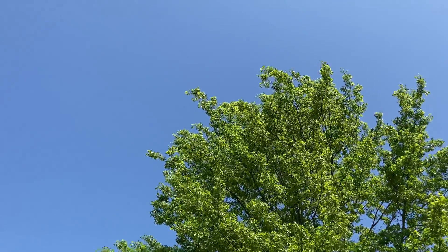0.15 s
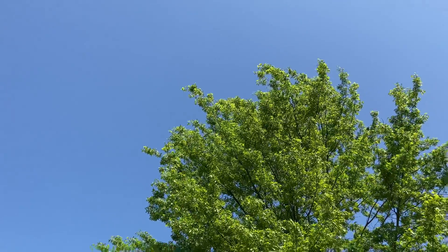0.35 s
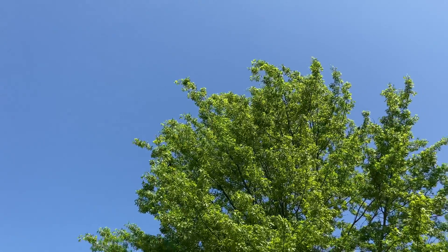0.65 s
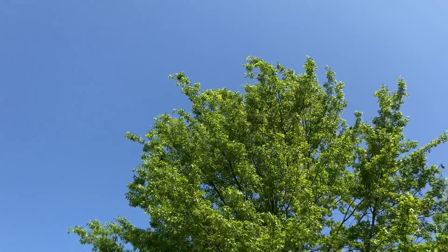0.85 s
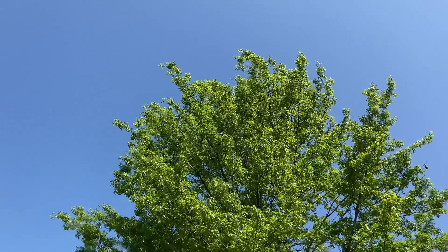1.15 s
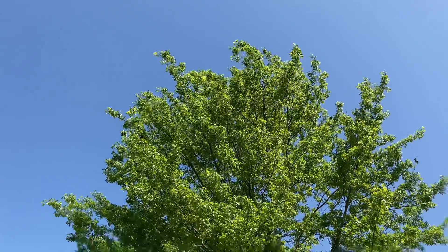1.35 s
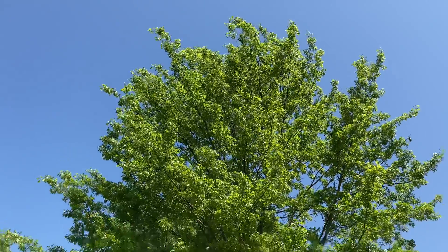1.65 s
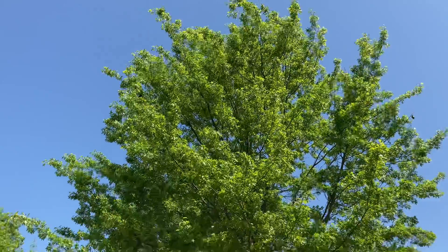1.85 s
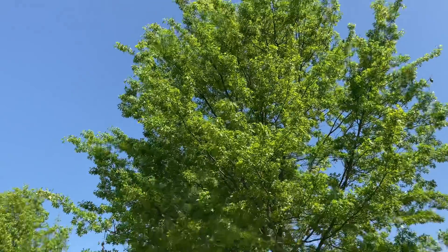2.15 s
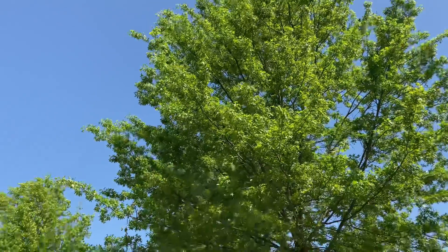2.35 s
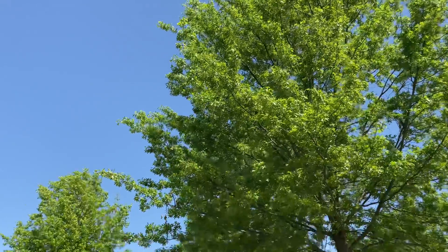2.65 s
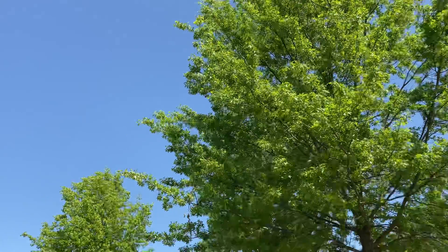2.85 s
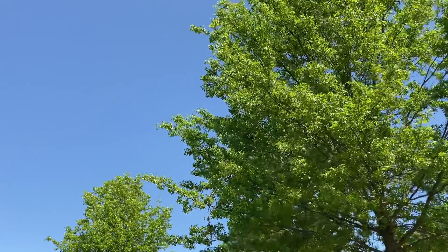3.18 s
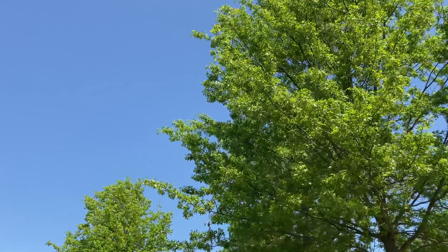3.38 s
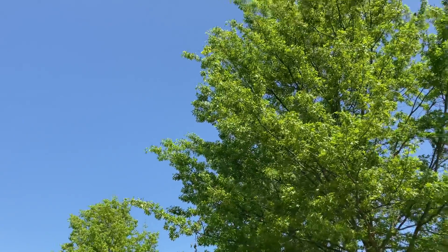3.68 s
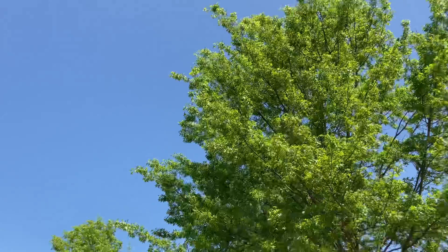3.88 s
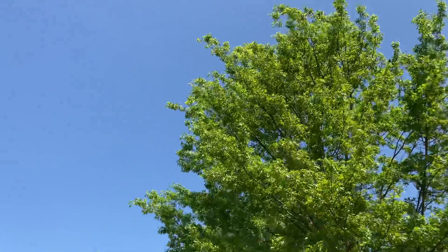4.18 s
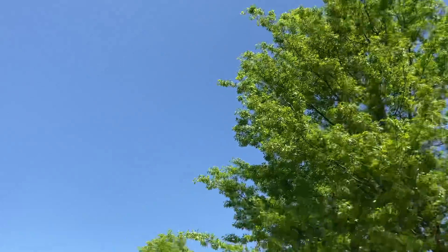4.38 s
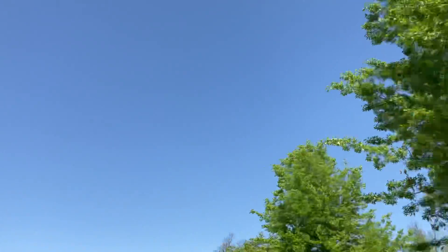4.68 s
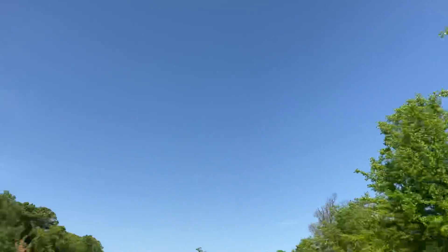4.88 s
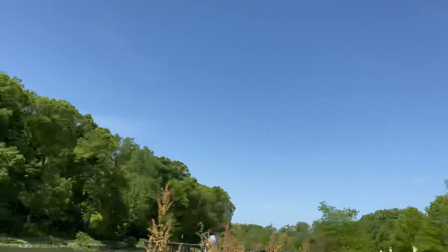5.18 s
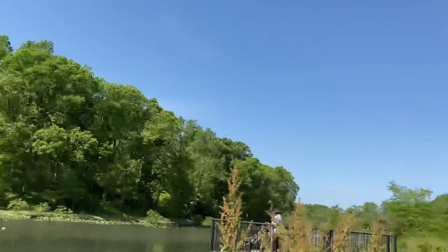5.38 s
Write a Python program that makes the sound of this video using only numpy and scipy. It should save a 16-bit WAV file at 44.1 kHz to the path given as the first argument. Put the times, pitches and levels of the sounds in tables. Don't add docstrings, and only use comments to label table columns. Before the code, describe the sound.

In an open park, faint songbirds chirp and slur over a soft low traffic rumble. Harsh, short chucks come singly, then a clear falling alarm whistle sounds near two seconds. A wind gust thumps the phone microphone around three and a half seconds. A second whistle follows near five, then a loud chuck and another low wind bump. Leaves and ground return soft echoes in wide stereo.

```python
import sys
import numpy as np
from scipy import signal
from scipy.fft import rfft, irfft, next_fast_len
from scipy.io import wavfile
from scipy.ndimage import uniform_filter1d

SR = 44100
rng = np.random.default_rng(int(sys.argv[2]) if len(sys.argv) > 2 else 0)


def log_audio(samples):
    frames = np.atleast_2d(samples).T
    limited = np.clip(frames, -1, 1)
    pcm = np.round(limited * 32767).astype(np.int16)
    wavfile.write(sys.argv[1], SR, pcm)


def field_ratio(decibels):
    return 10 ** (np.asarray(decibels, dtype=float) / 20)


N = 243873
OPPOSITE = np.array([[1], [-1]])


def level(x, db):
    return x * field_ratio(db) / np.sqrt(np.mean(x ** 2))


def walk(rate, size=N):
    hold = max(int(SR / rate), 1)
    steps = np.repeat(rng.standard_normal(size // hold + 1), hold)
    return 1.3 * uniform_filter1d(uniform_filter1d(steps, hold), hold)[:size]


def glide(t, at, span):
    return .5 - .5 * np.tanh((t - at) / span / 2)


def breeze(points, swell_db, flicker_db):
    size = next_fast_len(N, True)
    octave = np.log2(np.fft.rfftfreq(size, 1 / SR) + 1)
    hz, db = np.transpose(points)
    colour = field_ratio(np.interp(octave, np.log2(hz), db, -200, -200))
    spectrum = rfft(rng.standard_normal(size)) * colour
    total = 0
    for band in np.arange(np.floor(np.log2(hz[0])), np.log2(hz[-1]) + 1):
        part = irfft(spectrum * np.clip(1 - abs(octave - band), 0, 1), size)[:N]
        total = total + part * field_ratio(swell_db * walk(2.4) + flicker_db * walk(14))
    return level(total, 0)


def add(out, s, x, pan_db, rad, lead_ms):
    size = next_fast_len(len(x) + 128, True)
    hz = np.fft.rfftfreq(size, 1 / SR)
    turn = rad + 2 * np.pi * (hz - 4000) * lead_ms / 1000
    spectrum = rfft(np.pad(x, 64), size)
    at = int(s * SR)
    for port, sign in enumerate((.5, -.5)):
        y = irfft(spectrum * np.exp(1j * sign * turn), size)[64:] * field_ratio(sign * pan_db)
        out[port, at:at + len(y)] += y[:N - at]


def open_air():
    # f/Hz, level/dB per Hz
    common = [(160, -37.5), (280, -4.5), (694, -7.5), (1120, -7), (2100, -17.5), (3990, -23.5),
              (5600, -38.5), (8060, -53)]
    # f/Hz, level/dB per Hz
    opposed = [(160, -39), (280, -6), (800, -1.5), (2010, -9.5), (2850, -19), (3790, -17), (6200, -32.5),
               (8060, -54.5)]
    return field_ratio(-59) * breeze(common, 0.19, 1.0) + field_ratio(-59) * breeze(opposed, 0.72, 0.91) * OPPOSITE


def hiss():
    # f/Hz, level/dB per Hz
    noise_points = [(5500, -28.5), (6300, -25), (7500, 1), (9000, 3), (11000, 1), (13000, -3.5),
                    (16000, -17.5)]
    return field_ratio(-87.5) * breeze(noise_points, 1, 1.5)


def wind():
    # t/s, spread/s, level over calm/dB
    gusts = [(0.0, .06, 4.5), (.72, 0.071, 4.5), (1.38, 0.029, 5.5), (2.3, 0.25, 2.5), (2.74, 0.16, 3),
             (3.299, 0.19, 5), (3.511, 0.095, 14), (3.629, 0.032, 21), (3.78, 0.015, 6.5),
             (3.95, 0.057, 1.5), (4.22, 0.065, 5), (4.48, 0.15, 3.5), (4.75, 0.088, 8.5), (4.98, 0.089, 7),
             (5.33, .045, 16), (5.53, 0.062, 3.5)]
    # t/s, peak level/dB, f/Hz
    thumps = [
        (3.489, -27, 70),
        (3.553, -29, 90),
        (3.622, -19.5, 135),
        (4.809, -30, 119),
        (4.965, -33, 120),
        (5.289, -31, 110),
        (5.33, -25, 85),
        (5.349, -27, 210),
        (5.353, -29, 110),
    ]
    # f/Hz, level/dB per Hz
    rumble = [(13, -41.5), (22, -31), (35, -17), (54, 2), (91, -2.5), (119, -3), (170, -20.5), (240, -52)]
    flutter = [(120, -5.5), (150, 3.0), (220, -4.0), (330, -11), (400, -18.0)]  # f/Hz, level/dB per Hz
    t = np.arange(N) / SR
    gust_db = np.max([db * np.exp(-.5 * ((t - s) / spread) ** 2) for s, spread, db in gusts], axis=0)

    def buffeting(extra_db):
        slow = breeze(rumble, 0.28, 1.0) * field_ratio(-47 + gust_db)
        quick = breeze(flutter, 0.39, 2.6) * field_ratio(-57.5 + 0.66 * gust_db + extra_db)
        return slow + quick

    mid, side = buffeting(0), buffeting(2.5)
    for at, db, hz in thumps:
        pulse = np.exp(-.5 * ((t - at) * hz / 0.8) ** 2)
        mid = mid + field_ratio(db) * pulse * np.sin(2 * np.pi * hz * (t - at))
    return mid + field_ratio(-10.5) * side * OPPOSITE


def far_birds():
    # t/s, length/s, start f/Hz, end f/Hz, level/dB
    chatter = [(0.079, .055, 3900, 5870, -70), (.12, 0.044, 4710, 3870, -64.5),
               (0.161, 0.078, 3700, 2980, -56), (.578, 0.027, 2710, 2690, -53),
               (0.826, .045, 5780, 4200, -65), (0.865, 0.11, 4000, 2900, -60.5),
               (0.804, 0.029, 5500, 5660, -70.5), (1.256, 0.055, 4600, 3600, -65.5),
               (1.746, 0.033, 4600, 4730, -63), (1.792, .048, 4000, 3110, -66),
               (3.231, 0.075, 3800, 5280, -64.5), (3.296, 0.049, 4400, 3670, -59),
               (3.429, 0.034, 3550, 3480, -63), (3.86, 0.046, 3900, 4080, -58.5),
               (3.93, 0.04, 4030, 4370, -62), (4.363, 0.052, 3700, 3854, -63),
               (5.051, 0.12, 1500, 1614, -59.5)]
    # t/s, length/s, start f/Hz, end f/Hz, level/dB
    pipes = [(.135, 0.046, 4210, 4200, -64), (.505, .051, 3550, 3430, -56.5), (.58, .026, 3500, 3400, -76),
             (1.79, .035, 3700, 3880, -63.5), (1.97, .05, 2750, 2830, -66), (2.33, .057, 2800, 2830, -68.5),
             (2.65, .13, 3580, 3470, -59.5), (2.725, 0.046, 4560, 4450, -59.5),
             (2.83, 0.096, 3600, 3520, -63), (3.41, 0.11, 2150, 1730, -62), (3.44, 0.06, 2250, 2100, -77),
             (3.437, 0.15, 3430, 3476, -69.5), (3.585, 0.058, 5750, 5540, -72),
             (4.79, 0.066, 3400, 2345, -64.5), (5.44, 0.15, 3750, 3310, -62), (5.44, 0.1, 4400, 4000, -64)]
    # t/s, start f/Hz, end f/Hz, level/dB
    strokes = [(0, 3120, 3590, -61.5), (1.015, 4600, 5880, -72), (1.125, 6100, 6850, -78),
               (1.356, 3960, 4700, -80), (1.43, 6270, 6470, -76), (4.125, 2770, 3270, -73.5),
               (4.143, 3320, 4000, -70), (4.294, 4800, 5730, -80), (4.36, 2560, 3360, -72),
               (4.4, 3660, 2820, -64.5), (4.445, 4400, 5860, -73), (4.45, 3730, 3890, -67),
               (4.469, 3830, 4520, -58.5), (4.515, 4400, 3580, -75), (4.538, 3600, 4370, -60.5),
               (4.555, 2960, 3650, -62), (4.65, 4270, 4630, -72), (4.741, 2980, 3400, -66),
               (5.514, 1750, 1710, -55)]
    # t/s, length/s, f/Hz, level/dB
    buzzes = [
        (0.125, 0.23, 5730, -77.5),
        (0.226, .32, 6540, -82),
        (0.572, .14, 6500, -83.5),
        (1.479, 0.087, 5470, -66.5),
        (1.581, 0.045, 5980, -73),
        (1.877, 0.094, 5480, -74.5),
        (3.687, .25, 5280, -69.5),
        (4.507, .055, 4960, -79),
    ]
    # t/s, low part level/dB, high part level/dB
    slurs = [(.085, -59, -66), (2.02, -71.5, -72), (2.21, -65.5, -72), (2.405, -65, -70), (2.6, -66, -60),
             (2.79, -58, -59.5), (2.975, -58, -60), (3.175, -61, -62), (3.365, -62.5, -61.5),
             (3.58, -73.5, -71), (3.95, -69, -82)]
    low_hz, mid_hz, top_hz = 1950, 2520, 3450
    rise_s, climb_s, slur_echo_s = .04, .065, .024
    chorus_low_hz, chorus_high_hz, chorus_sweep_hz = 2330, 6470, 504

    # t/s, length/s, start f/Hz, end f/Hz, warble/Hz, level/dB
    notes = [(*row[:4], 330, row[4]) for row in chatter]
    notes += [(*row[:4], 40, row[4]) for row in pipes]
    notes += [(s, .022, hz0, hz1, 80, db) for s, hz0, hz1, db in strokes]
    notes += [(s, length, hz, hz, 500, db) for s, length, hz, db in buzzes]
    for s, low_db, high_db in slurs:
        for late in (0, slur_echo_s):
            notes.append((s + late, rise_s, low_hz, mid_hz, 30, low_db))
            notes.append((s + late + rise_s, climb_s, mid_hz, top_hz, 85, high_db - 4))
    notes += [(3.225 + k / 26.2, .012, 7200, 5800, 250, -71 - 1.3 * abs(k - 5)) for k in range(10)]
    for when, high, long, sweep, loud in rng.uniform(0, 1, (130, 5)):
        hz = chorus_low_hz + (chorus_high_hz - chorus_low_hz) * high
        end_hz = hz + chorus_sweep_hz * (2 * sweep - 1)
        notes.append((when * N / SR, 0.015 + .02 * long, hz, end_hz, 60, -77 + 12.5 * loud - 11 * high))

    out = np.zeros((2, N))
    for (s, length, hz0, hz1, warble_hz, db), side in zip(notes, rng.uniform(-1, 1, (len(notes), 2))):
        u = np.linspace(0, 1, int(length * SR))
        pitch = hz0 + (hz1 - hz0) * u + warble_hz * walk(1100, size=len(u))
        grain = level(field_ratio((1.6 + warble_hz / 260) * walk(180, size=len(u))), 0)
        swell = np.sin(np.pi * u) ** .6 * grain
        tone = np.sqrt(2) * np.sin(2 * np.pi * np.cumsum(pitch) / SR)
        rad = 2.1 * side[1] if hz0 > mid_hz else .8
        add(out, s, field_ratio(db) * swell * tone, 2 * side[0], rad, 0)
    return out


def foliage(x, echoes):
    t, tail = np.arange(SR) / SR, 0
    for late, t60, db, dull in echoes:
        poles = [1, -2 * dull * np.cos(2 * np.pi * 3800 / SR), min(dull, .95) ** 2]
        spray = signal.lfilter([1, -1], poles, rng.standard_normal((2, SR)))
        decay = (t > late) * 1000 ** (-t / t60)
        tail = tail + level(spray * decay, db - 10 * np.log10(SR))
    return signal.fftconvolve(x, tail, axes=1)[:, :N]


def chucks():
    # t/s, peak level/dB, throat f/Hz, throat width/Hz, length/ms
    calls = [
        (0.559, -36.5, 2670, 890, 7.8),
        (1.202, -42.5, 3930, 1740, 8.9),
        (2.1, -45.5, 3600, 1625, 10.2),
        (2.625, -44, 3600, 2370, 10),
        (3.798, -42, 3800, 1380, 9.1),
        (4.958, -38.5, 3160, 1960, 10),
        (5.286, -31.5, 3340, 2180, 10.2),
    ]
    # left over right level/dB, left lead at 4 kHz/rad, left lead/ms
    seats = [(6, 1.5, 0.072), (-3.5, -1.5, 0.035), (0.5, -1.5, 0.094), (4, 1, 0.015), (2.5, 1.1, 0.21),
             (5.5, 5, 0.33), (2.5, 5.5, 0.35)]
    rasp_hz, rasp_width_hz = 9600, 1000
    out = np.zeros((2, N))
    t, hz = np.arange(-1500, 2596) / SR, np.fft.rfftfreq(4096, 1 / SR)
    for (s, db, throat_hz, width_hz, ms), seat in zip(calls, seats):
        clicks = rng.standard_normal(len(t)) * field_ratio(2.5 * walk(450, size=len(t)))
        throat = 1 / (1 + (2 * (hz - throat_hz) / width_hz) ** 2) ** 1.7
        rasp_db = -60.5 + 18 * width_hz / 1000
        rasp = field_ratio(rasp_db) / (1 + ((hz - rasp_hz) / rasp_width_hz) ** 2)
        tick = field_ratio(-47)
        rattle = irfft(rfft(clicks) * (throat + rasp + tick))
        rattle = rattle / abs(signal.hilbert(rattle)) ** .2
        stretch = np.where(t > 0, 1.2, np.clip(ms / 8.5, .3, 1) ** 7)
        burst = np.exp(-.5 * (1000 * t / ms / stretch) ** 2)
        add(out, s + t[0], level(rattle, db) * burst, *seat)
    return out


def whistles():
    # start t/s, snap after/s, sag time/s, slide after/s, resting f/Hz
    calls = [
        (2.083, .0257, .0637, .2388, 3492),
        (4.877, .032, .0506, .2541, 3510),
    ]
    # left over right level/dB, left lead at 4 kHz/rad, left lead/ms
    seats = [(-0.5, 2.07, 0.05), (1.5, 0.9, -0.063)]
    # t after start/s, level/dB
    efforts = [
        [(0, -58), (.025, -24.5), (.065, -38.5), (.112, -36.5), (.19, -25), (.255, -24), (.292, -19.5),
         (.318, -24.5), (.372, -40.5)],
        [(0, -63), (.027, -28), (.05, -34), (.125, -43.5), (.165, -28.5), (.205, -24.5), (.325, -25),
         (.338, -36), (.39, -42)],
    ]
    # pitch f/Hz, 2nd level/dB, 3rd level/dB, 4th level/dB
    overtones = [(3520, -35, -16.5, -49.5), (3600, -32, -15.5, -28.5), (3800, -20, -16.5, -21),
                 (3965, -16, -17, -32.5), (4360, -28.5, -32.5, -61), (4600, -27, -19, -60),
                 (4940, -17, -32.5, -60), (6200, -25.5, -54.5, -60)]
    snap_hz, sag_hz = (1160, 968), (1098, 1299)
    slide_hz, snap_s, slide_s = 768, .007, .0295
    cutoff_s, cutoff_db = 0.0096, -30.5
    out = np.zeros((2, N))
    tract_hz, *tract_db = np.transpose(overtones)
    for call, snap_depth, sag_depth, effort, seat in zip(calls, snap_hz, sag_hz, efforts, seats):
        start, snap, sag, slide, rest_hz = call
        last_s, last_db = effort[-1]
        s, db = np.transpose(effort + [(last_s + cutoff_s, last_db + cutoff_db)])
        t = np.arange(0, s[-1], 1 / SR)
        pitch = rest_hz + snap_depth * glide(t, snap, snap_s)
        pitch = pitch + sag_depth * np.exp(-t / sag) + slide_hz * glide(t, slide, slide_s)
        pitch = pitch + 4.0 * walk(150, size=len(t))
        phase = 2 * np.pi * np.cumsum(pitch) / SR
        tone = np.sin(phase)
        for k, gain_db in enumerate(tract_db, 2):
            audible = k * pitch < .45 * SR
            tone = tone + field_ratio(np.interp(pitch, tract_hz, gain_db)) * np.sin(k * phase) * audible
        breath = field_ratio(np.interp(t, s, db) + 1.2 * walk(60, size=len(t)))
        add(out, start, np.sqrt(2) * tone * breath, *seat)
    return out


def ground_bounce(near):
    delays_s = (0.0068, .0075)
    return field_ratio(-13.5) * np.array([np.roll(port, int(late * SR)) for port, late in zip(near, delays_s)])


def treble_haze():
    # t/s, level/dB, t60/s
    hazes = [
        (2.089, -65.5, 0.46),
        (4.9, -71, 1.1),
        (5.28, -73, 15),
    ]
    t, haze = np.arange(N) / SR, 0
    for s, db, t60 in hazes:
        rise = 1 - glide(t, s, .012 / 2)
        haze = haze + field_ratio(db) * rise * 1000 ** (-np.maximum(t - s, 0) / t60)
    return breeze([(6500, -7.5), (9000, 7), (16000, -3.5)], 1.5, 1.5) * haze


def scene():
    # delay/s, t60/s, level/dB, dullness 0-1
    near_echoes = [
        (.004, .2, -14, .4),
        (.03, .95, -29, .84),
    ]
    far_echoes = [
        (.01, .12, -12, .5),
        (.03, .7, -5, .5),
    ]
    far = far_birds()
    near = chucks() + whistles()
    birds = near + ground_bounce(near) + foliage(near, near_echoes) + far + foliage(far, far_echoes)
    return birds + open_air() + hiss() + wind() + treble_haze()


def mask(x):
    hz, _, z = signal.stft(x, SR, nperseg=2048, noverlap=1024)
    power = uniform_filter1d(np.sum(abs(z) ** 2, axis=0), size=16, axis=0)
    loudest = power[hz > 2500].max(axis=0)
    edge = np.clip((hz - 2400) / 2200, 0, 1)[:, None] ** 2
    threshold = edge * (loudest * field_ratio(2 * -46) + field_ratio(2 * -114))
    keep = power / (threshold + 1e-30)
    return signal.istft(z * np.clip(keep - .5, .03, 1), SR, nperseg=2048, noverlap=1024)[1]


def band_limit(x):
    return signal.sosfilt(signal.butter(12, 16620, fs=SR, output="sos"), x)


def record(dry):
    treble_hz, treble_rad, lag_samples, top_hz = 6450, 3.7, 10, 15850
    margin = 4096
    wide = np.pad(dry, ((0, 0), (margin, margin)), "reflect", reflect_type="odd")
    wide = wide * signal.windows.tukey(wide.shape[1], .015)
    hz, both = np.fft.rfftfreq(wide.shape[1], 1 / SR), rfft(wide, axis=1)
    treble = np.clip((hz - treble_hz) / 300 + .5, 0, 1)
    turn = np.exp(1j * (treble_rad - 2 * np.pi * hz * lag_samples / SR))
    both = both * (1 - treble) + treble * both[1] * np.array([turn, np.ones(len(hz))])
    heard = mask(irfft(both * (hz < top_hz), wide.shape[1], axis=1))[:, margin:margin + N]
    heard = heard * signal.windows.tukey(N, .004)
    return band_limit(heard)


dry = scene()
out = record(dry)
log_audio(out)
```